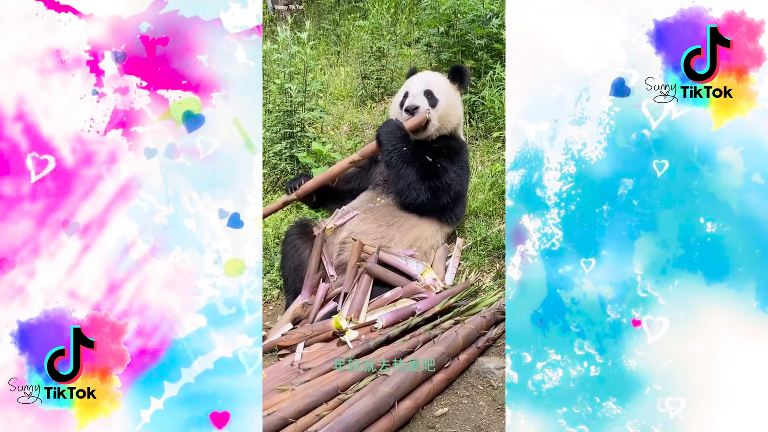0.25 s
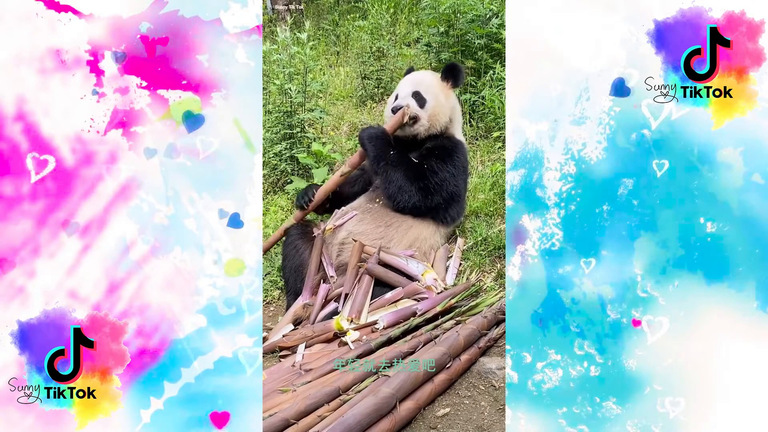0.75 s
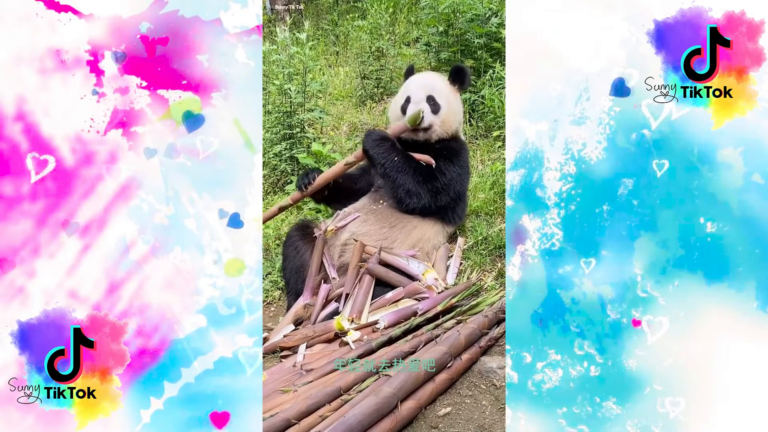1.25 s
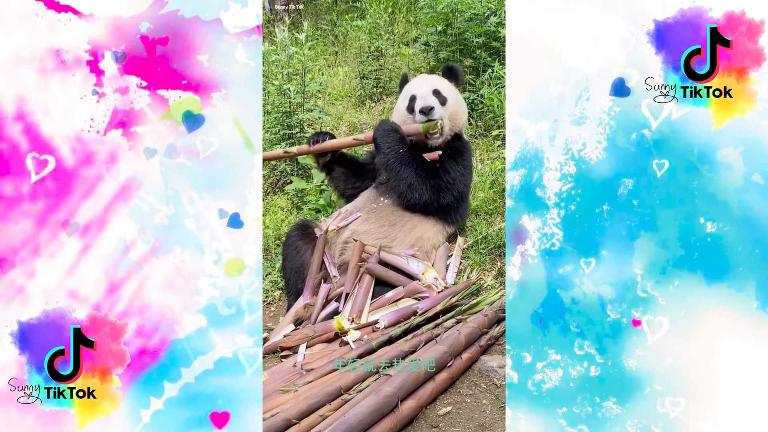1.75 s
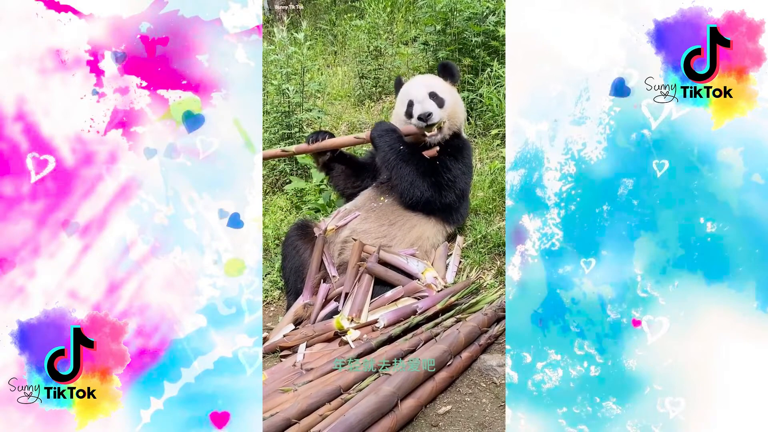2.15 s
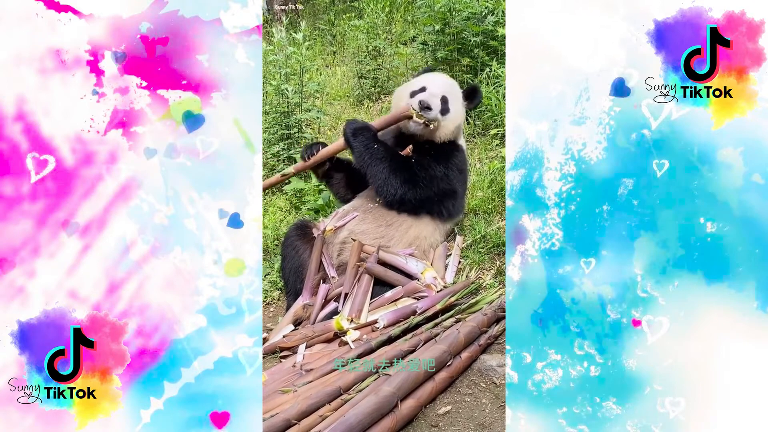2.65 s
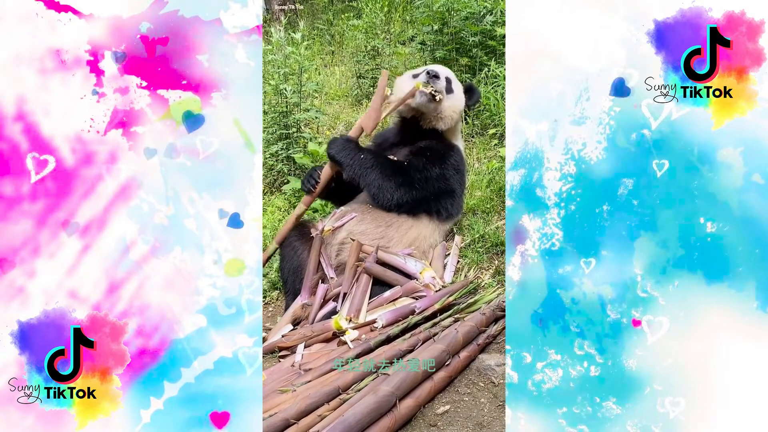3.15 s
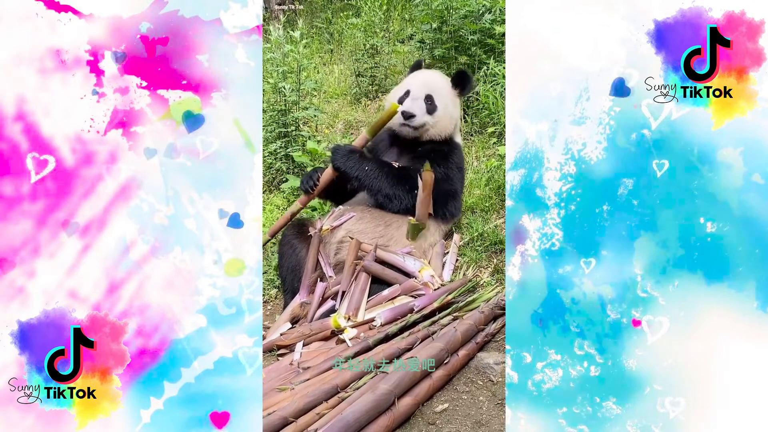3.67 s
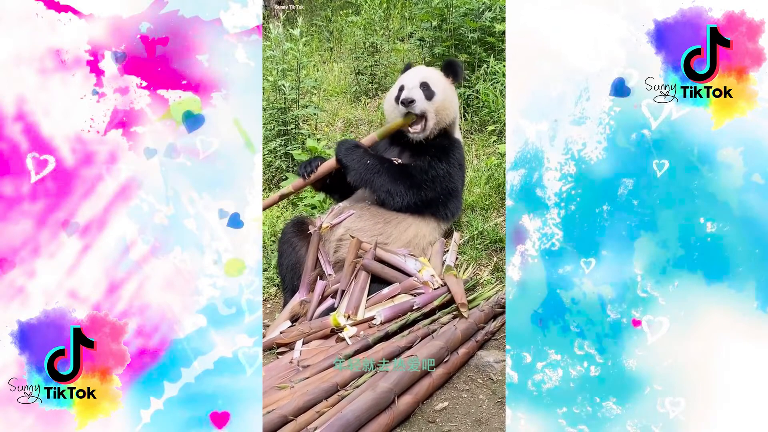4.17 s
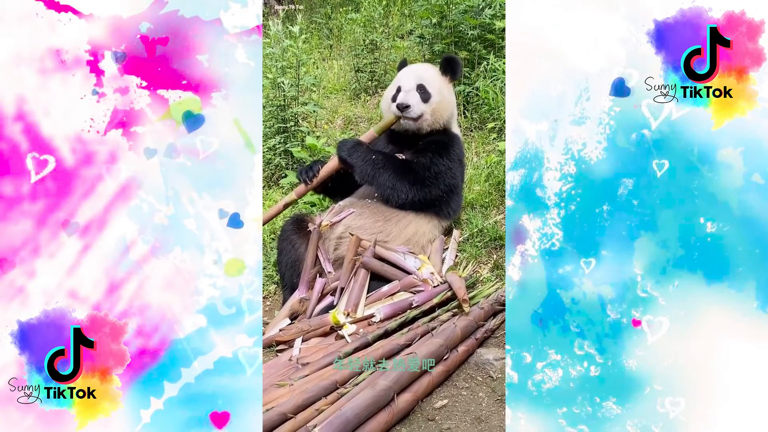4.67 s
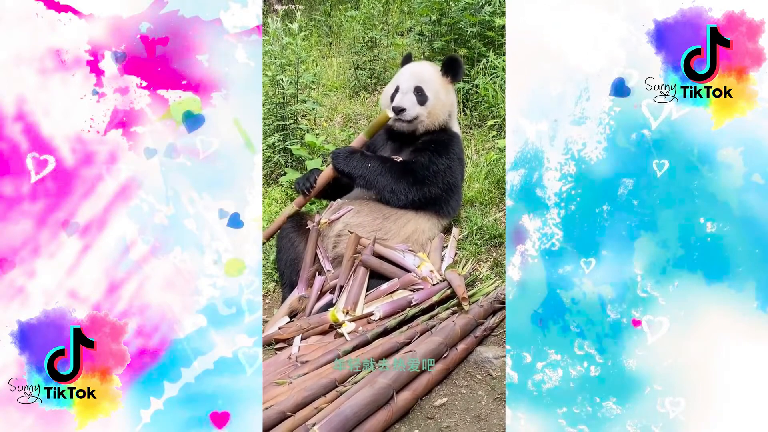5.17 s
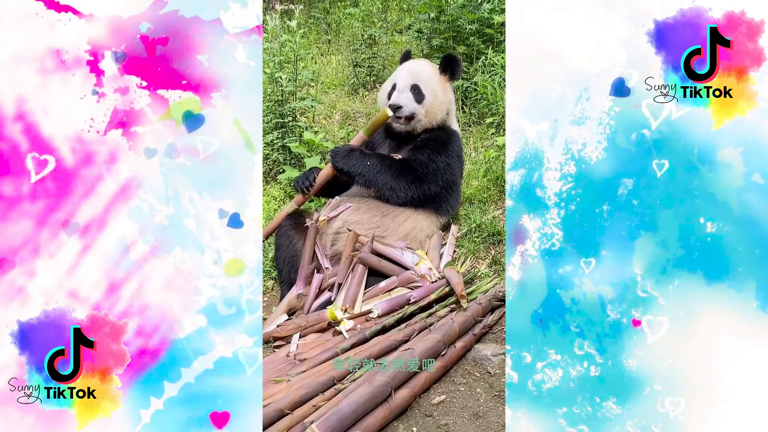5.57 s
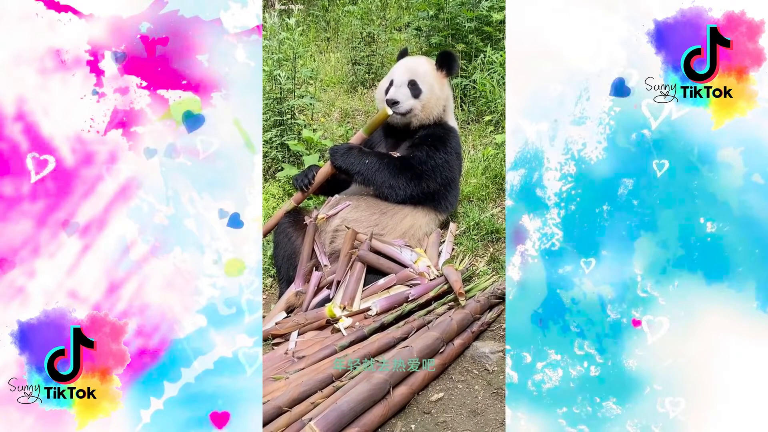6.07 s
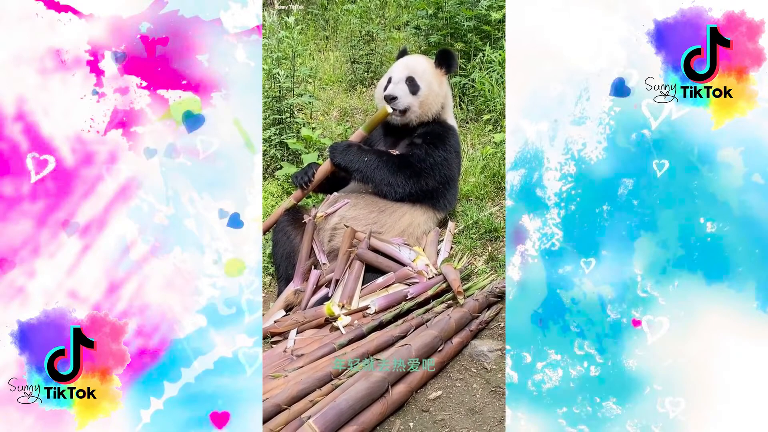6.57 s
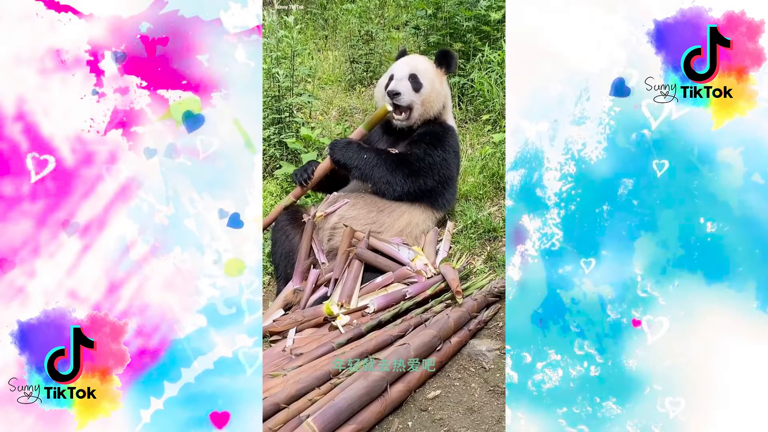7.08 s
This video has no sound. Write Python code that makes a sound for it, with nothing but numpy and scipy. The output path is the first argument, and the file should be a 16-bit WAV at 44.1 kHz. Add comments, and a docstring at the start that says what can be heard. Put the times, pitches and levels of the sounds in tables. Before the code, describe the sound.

Steady soft foliage hiss and low air rumble run throughout, the rumble sinking from about 3 to 6.7 s. From 0.3 to 0.8 s a close panda, slightly right, makes light dry fibre snaps with papery husk rubbing; a few mouth clicks follow to 1.9. At 2.0 the bamboo splits with a loud, hard, hollow crack, and until 3.0 its skin tears away in dense sharp snaps, creaks and short rasps, loudest around 2.3 to 2.5. Husks rustle softly from 3.1 to 3.9, with a small rasp near 3.8. At 4.3 to 4.6 molars crush a mouthful, crunchy and growing, ending in a wet rising squeak. From 5 s uneven moist chews, smacks and soft hollow mouth tones continue, fading by 7. Faint high bird chirps come between 4 and 5.4; a thin, narrow insect buzz appears briefly at 4.9, then swells from 5.5 to 7. A last small snap comes at 7.3.

```python
"""Open air hums and hisses throughout: shaped noise, its low rumble turned down from about 3 to 6.7 s.
From 0.3 s a panda bites bamboo: fibres snap (noise bursts) as husks rub (noise grains) and the mouth clicks.
At 2 s the cane splits, ringing its modes; its skin tears off for a second in dense grains of crackle.
A far bird (gliding tones) chirps from 4 s; at 4.3 s molars crush a mouthful with grains and gliding resonances.
From 5 s wet chewing (grains, smacks) goes on while an insect (pulsed narrow noise) buzzes and swells."""
import sys
import numpy as np
from scipy import signal
from scipy.fft import rfft, irfft, next_fast_len
from scipy.io import wavfile
from scipy.ndimage import uniform_filter1d, map_coordinates

SR = 44100
rng = np.random.default_rng(int(sys.argv[2]) if len(sys.argv) > 2 else 0)


def persist_wave(psi):
    """Save psi, clipped to +-1, as 16-bit WAV."""
    counts = np.round(np.clip(psi, -1, 1) * 32767).astype(np.int16)
    wavfile.write(sys.argv[1], SR, np.atleast_2d(counts).T)


N = 323253
TIME = np.arange(N) / SR
HIT = np.arange(SR // 5) / SR  # time axis of one short event, s

# Air spectra. Each row: frequency in Hz, relative density in dB per Hz.
RUMBLE_SPECTRUM = [(20, -49), (45, -6), (70, -4), (160, -0.5), (280, -6), (550, -10), (1100, -9),
                   (2500, -23.5), (6000, -80)]
HISS_SPECTRUM = [(60, -11), (200, 0), (500, -6.5), (1100, 1.5), (2800, 4.5), (4500, 0), (5900, -1),
                 (7200, -22), (8500, -9), (10000, -17), (12000, -18), (14000, -27), (15700, -51)]
RUMBLE_DB, HISS_DB = -43, -43
RUMBLE_DIP_FROM_S, RUMBLE_DIP_TO_S, RUMBLE_DIP_EDGE_S, RUMBLE_DIP_DB = 2.97, 6.74, 0.11, -12

# Stereo width of the panda and of the air. Each row: frequency in Hz, side-to-mid ratio in dB.
PANDA_WIDTH = [(100, -47), (700, -15.5), (2400, -17.5), (4400, -14.5), (6500, -26), (10000, -7.5),
               (15000, -71)]
AIR_WIDTH = [(60, -17), (130, -19), (290, -7.5), (640, -1.5), (1400, -2.5), (3100, -21), (4500, -36),
             (6500, -61), (10000, -55)]
# Panda's stereo balance. Each row: frequency in Hz, left-to-right ratio in dB.
BALANCE = [(100, -1), (380, -1.5), (700, -5), (1300, -4), (2400, 0)]
# Decay of the enclosure. Each row: frequency in Hz, time to fall by 60 dB in seconds.
YARD_DECAY = [(200, 0.46), (2000, 0.12), (10000, 0.14)]
# Microphone response. Each row: frequency in Hz, gain in dB.
MIC_RESPONSE = [(6000, -2), (14000, -1), (15700, -2)]
TOP_HZ = 15700
ECHO_S, ECHO_DB = .00234, -11.5

# Insect phrases. Each row: start in seconds, length in seconds, final level in dB.
BUZZES = [(4.93, 0.11, -50), (5.523, 1.444, -38.5)]
BUZZ_SWELL_DB_PER_S, BUZZ_HOLD_S = 11, 0.4  # the swell ends BUZZ_HOLD_S before the phrase does
BUZZ_RISE_S, BUZZ_FALL_S = .06, 0.22  # per 20 dB
BUZZ_HZ, BUZZ_WIDTH_HZ, BUZZ_PULSES_PER_S = 4767, 140, 180
BUZZ_PULSE_DB, BUZZ_FLUTTER_DB = 1.5, 1

# Bird chirps. Each row: start in seconds, length in seconds, starting pitch in Hz, rise in Hz, level in dB.
CHIRPS = [(4.002, 0.13, 5250, 540, -44), (4.526, 0.15, 5250, 433, -45), (4.79, 0.11, 5660, 44, -46),
          (5.06, .17, 5400, 5, -45.5), (5.32, .13, 5970, -300, -47)]
CHIRP_ARCH_HZ, CHIRP_WAVER_HZ, CHIRP_FLICKER_DB = 160, 182, 2.5

# A paw rubs the husks. Each row: start in seconds, time to fall by 20 dB in seconds, relative level in dB.
RUBS = [(0.34, 0.34, -41.5), (0.55, 0.092, -47), (0.623, 0.36, -39.5), (3.1, 0.46, -47.5),
        (3.305, 0.45, -43), (3.623, 0.23, -52), (3.767, 0.077, -39), (3.864, 0.062, -45)]
RUB_RISE_S = 0.04  # per 20 dB

# Grain spectra. Each row: frequency in Hz, relative density in dB per Hz.
RUSTLE_SPECTRUM = [(400, 2.5), (1200, 15), (3000, 15), (5500, 8.5), (10000, 2.5), (13000, 4.5),
                   (15700, -20)]
CREAK_SPECTRUM = [(35, -48), (60, -12), (173, -1.5), (264, -12), (420, 4), (601, -6), (919, -5.5), (989, 3),
                  (1330, -0.5), (2000, 2), (2600, -1), (4400, -120)]
CRACKLE_SPECTRUM = [(800, -6.5), (1700, -12), (3000, 6.5), (5000, 3.5), (7000, -5), (10000, -5),
                    (14000, -12), (15700, -28)]
CHEEK_SPECTRUM = [(70, -28), (140, -3.5), (240, -18), (300, -14), (390, 1.5), (650, -14.5), (1050, -6.5),
                  (1400, -12), (2500, -26), (5000, -82)]
GRIND_SPECTRUM = [(600, -12), (1700, 8), (3600, 5.5), (5000, -0.5), (13000, -12), (15700, -50)]
PULP_SPECTRUM = [(300, -8.5), (750, -13), (1200, -7.5), (1750, 13.5), (2050, 3), (2400, 7.5), (4000, -4.5),
                 (10000, -14), (15700, -27)]
MUSH_SPECTRUM = [(300, -18.5), (550, -6), (790, -0.5), (1050, -4.5), (2000, -14), (5000, -80)]

# Jaw thuds. Each row: start in seconds, relative level in dB.
THUDS = [(4.555, -30.5), (5.545, -32), (5.585, -33), (5.633, -34)]
# Mouth hollow tones. Each row: start in seconds, length in seconds, starting pitch in Hz, glide in Hz, level in dB.
HOLLOWS = [(4.406, 0.11, 267.4, -38, -37.5), (5.52, 0.061, 784, 80, -43), (5.554, 0.11, 613, -93, -44),
           (6.088, 0.041, 776, 50, -28), (6.509, 0.037, 797, -84, -37)]
HOLLOW_WAVER_HZ = 22
# Tooth and tongue clicks. Each row: start in seconds, relative level in dB, mouth resonance in Hz,
# crisp part in dB relative to the click.
SMACKS = [(.928, -22, 517, -6), (1.157, -23.5, 1250, -2), (1.905, -21, 1300, -21), (4.178, -29.5, 330, 7),
          (4.261, -14, 1010, -26), (4.302, -19, 413, -17), (4.326, -24, 425, -15), (4.378, -6.5, 1640, -16),
          (4.38, -18, 414, -13), (4.465, -19, 1710, 0), (4.591, -20, 1230, 0), (4.997, -26, 2480, -19),
          (5.08, -27, 1680, 4), (5.523, -19, 2400, 0), (5.679, -26, 1600, 11), (6.066, -21.5, 1650, 0),
          (6.098, -25, 1580, -2), (6.111, -21, 1520, 1), (6.29, -13.5, 1630, -13), (6.322, -21, 2390, -25),
          (6.473, -22, 1640, -11), (6.496, -21.5, 1330, 6), (6.51, -13.5, 1730, -5),
          (6.876, -18.5, 1640, -3.5), (6.879, -24, 585, -20), (7.062, -23.5, 2300, -22)]

# Mouth resonances in the crush.
# Each row: starting frequency in Hz, glide in Hz per second, width in Hz, level in dB.
MOUTH = [(395, -250, 100, -44.5), (1073, 500, 86, -36), (1530, 1200, 160, -38), (2230, -2, 240, -47)]
# Resonances of wet fibres scraping.
# Each row: starting frequency in Hz, glide in Hz per second, width in Hz, level in dB.
SQUEAK = [(1700, 1300, 110, -31), (2300, 802, 390, -35.5), (2940, -1500, 1400, -43)]
# Rises and falls are per 20 dB.
SQUEAK_S, SQUEAK_RISE_S, SQUEAK_HOLD_S, SQUEAK_FALL_S = 4.47, 0.08, 0.032, 0.12
CRUSH_S, CRUSH_RISE_S, CRUSH_HOLD_S, CRUSH_FALL_S = 4.26, 0.047, 0.16, 0.2
MOUTH_HOLD_S = 0.15
CHEEK_DB, GRIND_START_DB, GRIND_GROWS_DB_PER_S = -36, -39, 49

# Chewing strokes. Each row: peak time in seconds, length in seconds, squelch level in dB, relative mush level in dB.
CHEWS = [(5.025, 0.13, -33.5, -62), (5.084, 0.11, -42, -41), (5.233, 0.038, -40.5, -55),
         (5.535, 0.089, -27.5, -36), (5.687, 0.041, -31, -34.5), (5.924, 0.19, -39.5, -44.5),
         (6.093, 0.11, -33.5, -36.5), (6.321, 0.16, -37.5, -43), (6.515, 0.13, -34, -37),
         (6.706, 0.49, -42.5, -37), (6.895, 0.21, -47, -41), (7.062, .05, -47, -55)]
CHEW_RISE, CHEW_FALL = 0.45, 0.59  # 20 dB swell and fade, as shares of a stroke's length

# Jaws pull at the skin. Each row: start of hold in seconds, hold in seconds, relative creak and crackle levels in dB.
PULLS = [(1.988, 0.044, -34, -43), (2.113, 0.03, -27.5, -31), (2.297, 0.21, -28.5, -27.5),
         (2.583, 0.18, -40, -35.5), (2.873, 0.14, -29, -36)]
PULL_RISE_S, CREAK_FALL_S, CRACKLE_FALL_S = 0.068, 0.16, 0.16  # per 20 dB
# Strips of skin rasp loose. Each row: start in seconds, length in seconds, relative level in dB.
RIPS = [(0.635, 0.12, -38.5), (2.25, 0.022, -22), (2.293, 0.014, -16), (2.42, 0.039, -17.5),
        (2.727, 0.035, -20), (2.811, 0.051, -18), (2.889, 0.027, -19.5), (2.948, 0.025, -22.5),
        (2.973, 0.037, -23.5), (2.999, 0.058, -27.5), (3.767, 0.031, -28.5)]

# Cane modes. Each row: frequency in Hz, relative level in dB, time to fall by 60 dB in seconds.
CANE_MODES = [(271.6, -12.5, 0.3), (689.6, 6.5, 0.05), (990, -12, 0.11), (1365, -0.5, 0.044),
              (1712, -14, 0.17), (1890, -13, 0.055), (2110, -13, .085), (2240, -24, 0.17), (2760, -24, .07),
              (3170, -21, 0.076), (3815, -14, 0.048), (4750, -20, .08)]
# Cane splits. Each row: start in seconds, relative level in dB, knock and fizz in dB relative to it, crack pitch in Hz.
SPLITS = [(1.983, 8, -12.5, -11, 1800), (1.998, -8, -22, -25, 1400), (2.0067, -5.5, 2, -32, 1100),
          (2.0695, -16, -16, 6, 1530), (2.1122, -3, -8, -5, 1400)]
# Fibre snaps. Each row: start in seconds, relative level in dB, knock and fizz in dB relative to it, fibre pitch in Hz.
SNAPS = [(0.3402, -12.5, -31, -6, 3320), (0.3519, -15.5, -26, -3, 4400), (.392, -16, -15, -9, 3220),
         (0.407, -21.5, -24, -15, 4700), (.456, -22, -25, -9, 3020), (0.4598, -16.5, -25, -20, 2970),
         (.51, -15.5, -13.5, -0.5, 4500), (.5379, -19, -21, -18, 3060), (0.5508, -10.5, -28, -5.5, 4070),
         (.627, -12.5, -4.5, -15, 2550), (0.636, -13, -23, -12, 4740), (0.639, -17, -22, -10, 5060),
         (0.7189, -19, -21, -27, 4730), (0.8046, -22, -8, -32, 1530), (1.877, -23.5, -4, -12, 1340),
         (1.933, -20, -10, -21, 2200), (1.972, -19.5, 5, -11, 1800), (2.0077, -8, -23, -8.5, 3100),
         (2.021, -18, -14, -2, 3300), (2.033, -20, -14, -6, 2600), (2.053, -28, 3, -12, 4500),
         (2.084, -14.5, -7, -11, 1910), (2.109, -12.5, -14, -4.5, 2100), (2.14, -9.5, -25, -10, 3400),
         (2.1618, -9.5, -9.5, -11, 3300), (2.212, -18.5, -6, -9, 2300), (2.247, -12, -7, -5, 2340),
         (2.2576, -8, -5.5, 0.5, 2340), (2.3031, 0.5, -5, -4, 3800), (2.3214, -4.5, -28, -4, 2790),
         (2.327, -2, -34, -23, 2940), (2.335, -4.5, -3, -10, 3020), (2.358, 0, -18, -4.5, 2850),
         (2.363, -9, -11, -2, 3600), (2.368, 1.5, -4.5, -20, 3050), (2.372, -8, -5, -6, 3020),
         (2.377, -2.5, -8, -11, 3170), (2.413, -12, -25, -3, 3300), (2.4217, -11, -31, 5, 3300),
         (2.432, -13, -12, -8, 4300), (2.438, -8, -9, -15, 4400), (2.4444, -5, -7, -38.5, 4650),
         (2.4558, 3, -6.5, -21, 3940), (2.4886, -15, 1, 6, 2600), (2.5006, -0.5, -7.5, -0.5, 3560),
         (2.525, -11, -23, -1, 2300), (2.5515, -4, -10.5, -5.5, 4760), (2.543, -15, -4, -5, 5200),
         (2.578, -12.5, -3, -2, 4530), (2.582, -3.5, -7, -6, 3650), (2.607, -10.5, 1, -19, 1800),
         (2.626, -19, -14, -5, 4500), (2.6516, -6, -21, -30, 4630), (2.6661, 0, -22, -25, 4460),
         (2.6992, -15, -19, -10, 2900), (2.745, -12, -7, -21, 2420), (2.8106, -15.5, -10, -10, 2350),
         (2.823, -14.5, -4, -8, 3000), (2.8282, -6, -9, -3.5, 2430), (2.843, -6, -20, -12, 1790),
         (2.893, -14, 1, -27, 2570), (2.9, -11, -12, -14, 3400), (2.9349, -4, -28, -23, 3640),
         (2.956, -14.5, -7, -31, 3400), (2.99, -14, -21, -40, 2870), (3.0164, -17.5, -1, -42, 2200),
         (3.332, -20, -15, -36, 2190), (3.7561, -23.5, -1.5, 6, 4340), (4.2412, -19.5, -25, -12, 3870),
         (4.326, -24, -14, -10, 2850), (4.3425, -26, -9, -25, 3500), (4.378, -14, -24, -32, 3150),
         (4.4114, -15, -14, -15, 3440), (4.4338, -18, -9, -25, 3600), (4.441, -14.5, -9, -26, 3200),
         (4.4534, -16.5, -16, -19, 3330), (4.472, -22, -7, -25, 2800), (4.49, -33, -6, -29, 3470),
         (7.313, -20, -26, -30, 4050)]


def amp(db):
    """Decibels to gain."""
    return 10 ** (np.asarray(db) / 20)


def unit(x):
    """Scale to rms 1."""
    return x / np.sqrt(np.mean(x ** 2, axis=-1, keepdims=True) + 1e-20)


def along(points, hz):
    """(Hz, value) points interpolated on a log frequency axis."""
    point_hz, values = np.transpose(points)
    return np.interp(np.log(hz + 1), np.log(point_hz + 1), values)


def wobble(knots_per_s):
    """A smooth random curve through normally distributed knots."""
    knots = rng.standard_normal(int(N * knots_per_s / SR) + 4)
    return map_coordinates(knots, [TIME * knots_per_s])


def swell(peak_s, rise_s, hold_s, fall_s):
    """A gain that peaks at peak_s and holds; rise_s and fall_s are the times to change by 20 dB."""
    before_s = np.maximum(peak_s - TIME, 0)
    after_s = np.maximum(TIME - peak_s - hold_s, 0)
    return amp(-20 * (before_s / rise_s + after_s / fall_s))


def filtered(x, response):
    """x times a response of frequency."""
    size = next_fast_len(N + SR // 2)
    return irfft(rfft(x, size) * response(np.fft.rfftfreq(size, 1 / SR)), size)[..., :N]


def colour(x, spectrum):
    """x through a (Hz, dB) spectrum."""
    return filtered(x, lambda hz: amp(along(spectrum, hz)))


def band(x, lo_hz, hi_hz, order=2):
    """Causal Butterworth band-pass."""
    sos = signal.butter(order, [lo_hz, min(hi_hz, .49 * SR)], "band", fs=SR, output="sos")
    return signal.sosfilt(sos, x)


def sized(x, db):
    """Give a hit the energy of one millisecond at rms level db."""
    return amp(db) * x / np.sqrt(np.sum(x ** 2, axis=-1, keepdims=True) * 1000 / SR)


def add(track, start_s, hit):
    """Lay a hit into the track at start_s."""
    room = track[:, max(round(start_s * SR), 0):][:, :hit.shape[-1]]
    room += hit[..., :room.shape[-1]]


def stereo(pair, width):
    """Mid and side to left and right."""
    side = colour(pair[1], width)
    return np.array([pair[0] + side, pair[0] - side])


def burst(rise_s, hold_s, decay_s, tail_db, tail_decay_s):
    """Mid and side noise of one fracture: it runs briefly, dies fast and leaves a faint shiver."""
    body = amp(-60 * np.maximum(HIT - hold_s, 0) / decay_s)
    shiver = amp(tail_db - 60 * HIT / tail_decay_s)
    return rng.standard_normal((2, len(HIT))) * (body + shiver) * (1 - np.exp(-HIT / rise_s))


def grains(spectrum, per_s, spread_db, life_s, bed):
    """Mid and side crackle of rms 1: tiny fractures of uneven size over a bed of rubbing."""
    size_db = spread_db * np.minimum(rng.exponential(size=N), 3)
    sizes = amp(size_db) * (rng.random(N) < per_s / SR)
    power = signal.lfilter([1], [1, -np.exp(-2 / (life_s * SR))], sizes ** 2)
    power /= np.abs(uniform_filter1d(power, size=SR // 16)) + 1e-9  # level out slow changes
    return unit(colour(np.sqrt(power + bed) * rng.standard_normal((2, N)), spectrum))


def chirp(length_s, start_hz, rise_hz, arch_hz, waver_hz, knots_per_s):
    """A wavering tone that swells and fades while its pitch glides along an arch."""
    progress = np.minimum(HIT / length_s, 1)
    arch = np.sin(np.pi * progress)
    waver = waver_hz * wobble(knots_per_s)[:len(HIT)]
    hz = start_hz + rise_hz * progress + arch_hz * arch + waver
    return arch * np.sin(2 * np.pi * np.cumsum(hz) / SR)


def ringing(resonances, start_s):
    """A run of tiny breaks rings resonances that glide for 0.3 s from start_s."""
    drive = (rng.random(N) < 600 / SR) * rng.standard_normal((2, N))
    out = np.zeros((2, N))
    for start_hz, glide_hz_per_s, width_hz, db in resonances:
        hz = start_hz + glide_hz_per_s * np.clip(TIME - start_s, 0, .3)
        turn = np.exp(2j * np.pi * np.cumsum(hz) / SR)
        pole = np.exp(-2 * np.pi * width_hz / SR)
        # shift the resonance to 0 Hz, low-pass, shift back
        ring = turn * signal.lfilter([1], np.poly([pole, pole]), drive / turn)
        out += amp(db) * unit(ring.real)
    return out


def air():
    """A low background rumble, turned down for a while, and the even hiss of foliage, both slightly restless."""
    dip_in = np.tanh((TIME - RUMBLE_DIP_FROM_S) / RUMBLE_DIP_EDGE_S)
    dip_out = np.tanh((TIME - RUMBLE_DIP_TO_S) / RUMBLE_DIP_EDGE_S)
    rumble_db = RUMBLE_DB + RUMBLE_DIP_DB * (dip_in - dip_out) / 2 + 0.82 * wobble(7)
    hiss_db = HISS_DB + 0.29 * wobble(4.22)
    rumble = amp(rumble_db) * unit(colour(rng.standard_normal((2, N)), RUMBLE_SPECTRUM))
    hiss = amp(hiss_db) * unit(colour(rng.standard_normal((2, N)), HISS_SPECTRUM))
    return stereo(rumble + hiss, AIR_WIDTH)


def yard(x):
    """The enclosure answers with a tail of decaying noise, the bass lasting longest."""
    hz, t, z = signal.stft(rng.standard_normal((2, SR // 2)), SR, nperseg=256)
    decay = amp(-60 * t / along(YARD_DECAY, hz)[:, None])
    tail = signal.istft(z * decay, SR, nperseg=256)[1]
    tail = tail * (1 - np.exp(-np.arange(tail.shape[1]) / (0.0027 * SR)))
    return signal.fftconvolve(x, tail / np.linalg.norm(tail[0]), axes=1)[:, :N]


def insect():
    """A far insect: fast, uneven pulses of buzz in one narrow resonance."""
    effort = np.zeros(N)
    for start_s, length_s, final_db in BUZZES:
        to_go_s = np.clip(start_s + length_s - BUZZ_HOLD_S - TIME, 0, length_s)
        phrase = swell(start_s, BUZZ_RISE_S, length_s, BUZZ_FALL_S)
        effort += amp(final_db - BUZZ_SWELL_DB_PER_S * to_go_s) * phrase
    pulse_hz = BUZZ_PULSES_PER_S * (1 + .08 * wobble(30))
    pulse = np.sin(2 * np.pi * np.cumsum(pulse_hz) / SR)
    flutter = wobble(150) + wobble(22)
    half_hz = BUZZ_WIDTH_HZ / 2
    buzz = band(rng.standard_normal((2, N)), BUZZ_HZ - half_hz, BUZZ_HZ + half_hz)
    pulsed = unit(buzz * amp(BUZZ_PULSE_DB * pulse + BUZZ_FLUTTER_DB * flutter))
    return effort * stereo(pulsed, [(4760, -11.5)])  # (Hz, side-to-mid dB)


def bird():
    """Thin, wavering, broken chirps, echoed by the trees."""
    out = np.zeros((2, N))
    for start_s, length_s, start_hz, rise_hz, db in CHIRPS:
        tone = chirp(length_s, start_hz, rise_hz, CHIRP_ARCH_HZ, CHIRP_WAVER_HZ, knots_per_s=370)
        add(out, start_s, amp(db) * tone)
    out = out * unit(amp(CHIRP_FLICKER_DB * wobble(70)))
    return out + yard(out)


def husks():
    """Dry husks rub under the paws: each rub starts quickly and dies away."""
    rub = sum(amp(db) * swell(start_s, RUB_RISE_S, 0, fall_s) for start_s, fall_s, db in RUBS)
    return amp(5.5) * rub * grains(RUSTLE_SPECTRUM, per_s=600, spread_db=3.5, life_s=.001, bed=.4)


def thuds():
    """Soft, low bumps of the closing jaw: two bands of a noise burst."""
    out = np.zeros((2, N))
    for start_s, db in THUDS:
        bump = burst(rise_s=0.0032, hold_s=0.0064, decay_s=0.054, tail_db=-20, tail_decay_s=.1)
        add(out, start_s, sized(band(bump, 113, 175), db - 1.5))
        add(out, start_s, sized(band(bump, 420, 570), db - 3))
    return out


def hollows():
    """The hollow of the mouth rings in soft, gliding tones as the tongue shifts."""
    out = np.zeros((2, N))
    for start_s, length_s, start_hz, glide_hz, db in HOLLOWS:
        tone = chirp(length_s, start_hz, glide_hz, 0, HOLLOW_WAVER_HZ, knots_per_s=141)
        add(out[:1], start_s, amp(db) * tone)  # mid only
    return out


def smacks():
    """Clicks in the mouth ring its cavity, whose pitch follows the jaw."""
    out = np.zeros((2, N))
    for start_s, db, mouth_hz, crisp_db in SMACKS:
        click = burst(rise_s=.0015, hold_s=.005, decay_s=.012, tail_db=-16, tail_decay_s=.06)
        add(out, start_s, sized(band(click, mouth_hz / 1.13, mouth_hz * 1.13), db - 3.0))
        add(out, start_s, sized(band(click, mouth_hz / 1.69, mouth_hz * 1.9, order=3), db - 7.0))
        add(out, start_s, sized(band(click, 2530, 4200, order=3), db + crisp_db - 8.5))
    return out


def crush_tones():
    """Breaking fibres ring the closing mouth, then scrape wetly as the crush ends."""
    press = swell(CRUSH_S, CRUSH_RISE_S, MOUTH_HOLD_S, CRUSH_FALL_S)
    slip = swell(SQUEAK_S, SQUEAK_RISE_S, SQUEAK_HOLD_S, SQUEAK_FALL_S)
    return press * ringing(MOUTH, CRUSH_S) + slip * ringing(SQUEAK, SQUEAK_S)


def chewing():
    """Molars crush a mouthful behind the cheeks, then work the wet pulp stroke by stroke."""
    press = swell(CRUSH_S, CRUSH_RISE_S, CRUSH_HOLD_S, CRUSH_FALL_S)
    # the grinding grows as the jaws close
    grind_db = GRIND_START_DB + GRIND_GROWS_DB_PER_S * np.clip(TIME - CRUSH_S, 0, CRUSH_HOLD_S)
    grind = amp(grind_db) * grains(GRIND_SPECTRUM, per_s=420, spread_db=2.5, life_s=.0015, bed=.2)
    cheek = amp(CHEEK_DB) * grains(CHEEK_SPECTRUM, per_s=350, spread_db=2.0, life_s=0.009, bed=0.36)
    squelch, mush = np.zeros(N), np.zeros(N)
    for peak_s, length_s, squelch_db, mush_db in CHEWS:
        stroke = swell(peak_s, CHEW_RISE * length_s, 0, CHEW_FALL * length_s)
        squelch += amp(squelch_db) * stroke
        mush += amp(mush_db) * stroke
    wet = squelch * grains(PULP_SPECTRUM, per_s=360, spread_db=5.5, life_s=0.0074, bed=0.27)
    dull = amp(-3.5) * mush * grains(MUSH_SPECTRUM, per_s=110, spread_db=3.5, life_s=0.015, bed=0.4)
    return press * (cheek + grind) + wet + dull


def tearing():
    """Skin peels at each pull in a dense run of small breaks that creak in the stalk and thicken into rasps."""
    creak, crackle, rasp = np.zeros(N), np.zeros(N), np.zeros(N)
    for start_s, hold_s, creak_db, crackle_db in PULLS:
        creak += amp(creak_db) * swell(start_s, PULL_RISE_S, hold_s, CREAK_FALL_S)
        crackle += amp(crackle_db) * swell(start_s, PULL_RISE_S, hold_s, CRACKLE_FALL_S)
    for start_s, length_s, db in RIPS:
        across = 2 * (TIME - start_s) / length_s - 1  # -1 to 1 over the rip
        rasp += amp(db) * np.sqrt(np.clip(1 - across ** 2, 0, 1))
    low_gain = amp(0.5) * creak + amp(-9.0) * rasp
    low = low_gain * grains(CREAK_SPECTRUM, per_s=350, spread_db=4, life_s=.004, bed=.15)
    high = amp(4.5) * crackle * grains(CRACKLE_SPECTRUM, per_s=600, spread_db=2.5, life_s=.0008, bed=.15)
    dense = amp(-1.5) * rasp * grains(CRACKLE_SPECTRUM, per_s=1100, spread_db=2, life_s=.0006, bed=.15)
    return low + high + dense


def cane_ring():
    """The cane's decaying modes, a little differently strong at every split."""
    ring = np.zeros(len(HIT))
    for hz, db, t60_s in CANE_MODES:
        chance_db = rng.normal(0, 1.5)
        ring += amp(db + chance_db - 60 * HIT / t60_s) * np.sin(2 * np.pi * hz * HIT)
    return ring


def splits():
    """A split runs along the cane with a hard crack and a low thud, and sets its hollow ringing."""
    out = np.zeros((2, N))
    for start_s, db, knock_db, fizz_db, crack_hz in SPLITS:
        crack = burst(rise_s=.0005, hold_s=.004, decay_s=.018, tail_db=-27, tail_decay_s=.1)
        thud = burst(rise_s=0.002, hold_s=0.01, decay_s=0.031, tail_db=-32, tail_decay_s=0.13)
        ring = cane_ring() * (1 - np.exp(-HIT / 0.00078))
        add(out, start_s, sized(band(crack, crack_hz / 2.38, crack_hz * 1.6, order=4), db - 1.5))
        add(out, start_s, sized(band(crack, 747, 900), db + knock_db + 2.0))
        add(out, start_s, sized(band(crack, 7200, 14800), db + fizz_db - 13.0))
        add(out, start_s, sized(band(thud, 42, 170), db + knock_db - 10))
        add(out, start_s, sized(ring, db + knock_db + 7.5))
    return out


def snaps():
    """Each fibre gives a sharp crack at its own pitch, a dull knock in the stalk and a brief fizz."""
    out = np.zeros((2, N))
    for start_s, db, knock_db, fizz_db, fibre_hz in SNAPS:
        crack = burst(rise_s=.0002, hold_s=.0008, decay_s=.008, tail_db=-19, tail_decay_s=.034)
        knock = burst(rise_s=.002, hold_s=.005, decay_s=.012, tail_db=-18, tail_decay_s=.07)
        add(out, start_s, sized(band(crack, 1200, 4880), db - 7.5))
        add(out, start_s, sized(band(crack, fibre_hz / 1.25, fibre_hz * 1.25), db - 4))
        add(out, start_s, sized(band(knock, 434, 1820), db + knock_db + 0.5))
        add(out, start_s, sized(band(crack, 4040, 9600), db + fizz_db + 1.5))
    return out


def near_echo(x):
    """A surface close by throws the sound back inverted; the gain offsets the added power."""
    gain = amp(ECHO_DB)
    return (x - gain * np.roll(x, round(ECHO_S * SR), axis=-1)) / np.sqrt(1 + gain ** 2)


def scene():
    """The panda sits a little to the right, in the open air."""
    stalk = near_echo(snaps() + tearing() + husks()) + splits()
    mouth = smacks() + chewing() + crush_tones() + hollows() + thuds()
    panda = stereo(stalk + mouth, PANDA_WIDTH)
    panda = filtered(panda, lambda hz: amp(np.outer([.5, -.5], along(BALANCE, hz))))
    return panda + amp(-17.0) * yard(panda) + insect() + bird() + air()


def record(dry):
    """The two microphone ports are out of step in the treble; the loudest cracks overload them."""
    def port_phase(hz):
        lead = 2 * np.pi * np.maximum(hz - 5000, 0) * .000187  # radians
        return np.exp(1j * np.outer([.5, -.5], lead))

    x = filtered(colour(dry, MIC_RESPONSE), port_phase)
    x = x / (1 + np.abs(x) ** 8) ** (1 / 8)  # soft limit at full scale
    return filtered(x, lambda hz: hz < TOP_HZ)


dry = scene()
out = record(dry)
persist_wave(out)
```